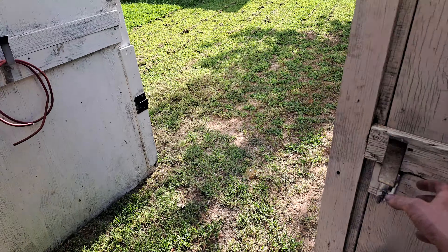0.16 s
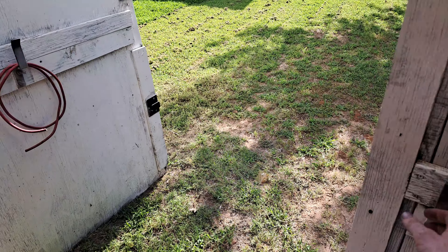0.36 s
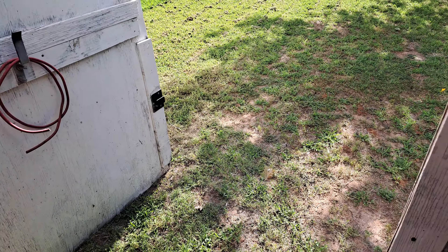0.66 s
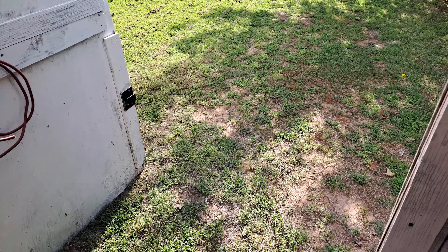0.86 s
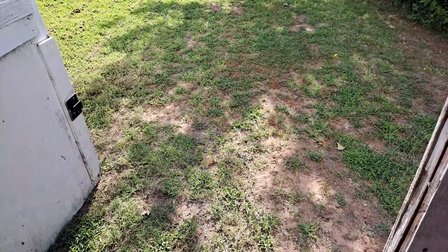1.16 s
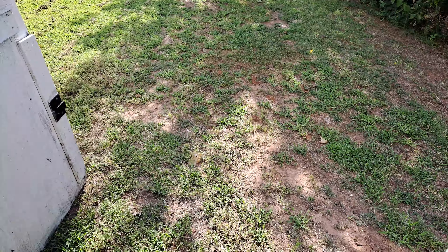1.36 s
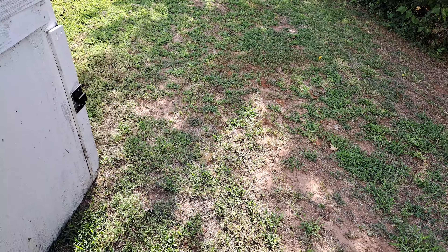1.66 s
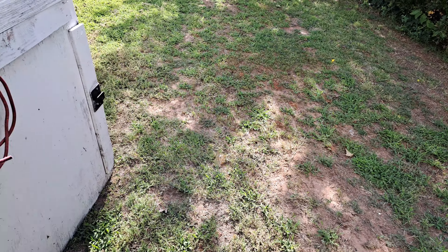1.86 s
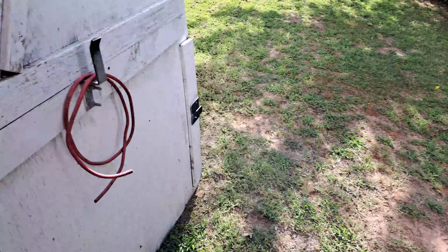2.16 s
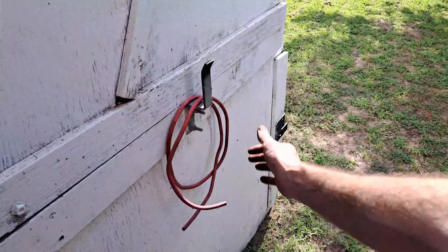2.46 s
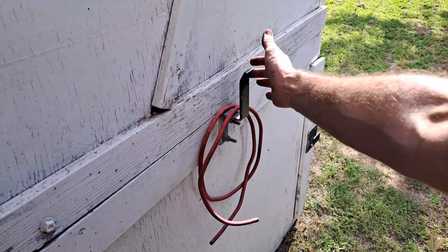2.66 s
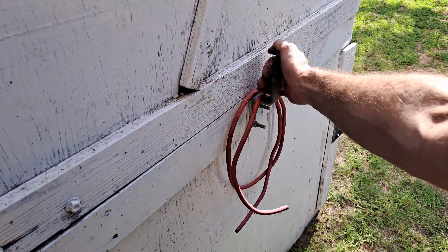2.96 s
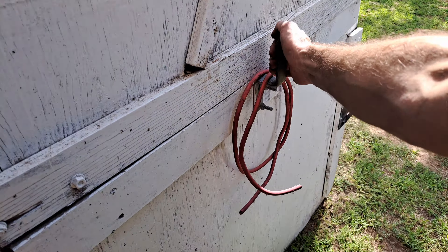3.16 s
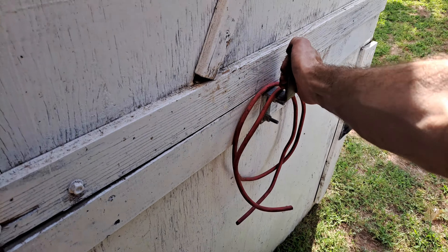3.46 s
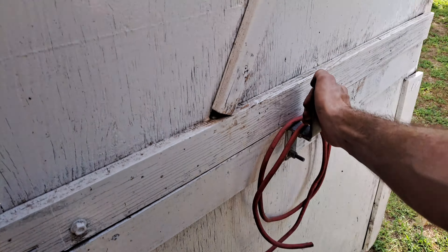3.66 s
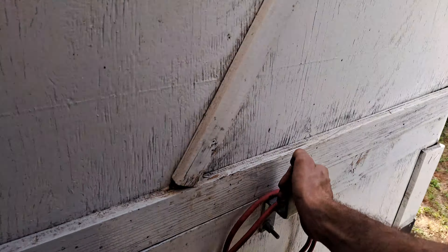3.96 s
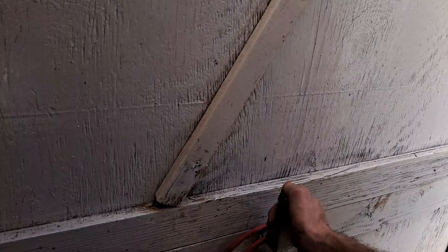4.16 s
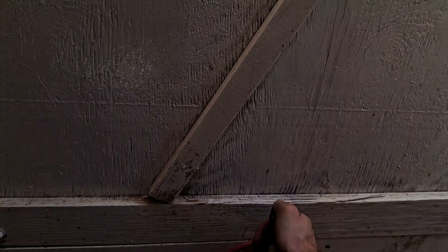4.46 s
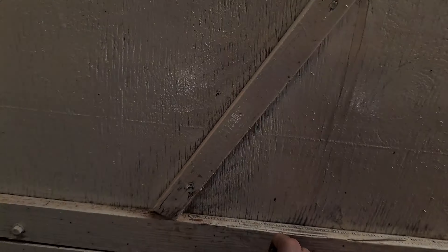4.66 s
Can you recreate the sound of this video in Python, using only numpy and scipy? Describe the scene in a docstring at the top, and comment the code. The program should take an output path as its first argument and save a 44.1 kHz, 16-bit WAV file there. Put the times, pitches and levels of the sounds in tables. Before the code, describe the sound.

Close up in a small shed, two plank doors are shut in turn. The first swishes through dry grass and hits its stop with a loud wooden bang and a quick metal rattle. A quieter moment leaves a low outdoor rumble and a faraway machine. Then the second door is grabbed and dragged, crackling and scraping in bursts, its boards shaking, until a low shudder and several knocks bring it home.

```python
"""Shutting two shed doors

Two plank doors are swung shut from inside. The first brushes over the grass, bangs against its stop
and shakes its iron latch; the second is grabbed by a hook, drags over the ground, shudders and knocks
home. Impacts excite the damped modes of wood and iron; stick-slip friction rasps and shakes the boards.
Outside are a far machine's drone and two faint whistles; the small shed reverberates briefly."""
import sys
import numpy as np
from scipy import signal
from scipy.fft import rfft, irfft, next_fast_len
from scipy.io import wavfile

SR = 44100
rng = np.random.default_rng(int(sys.argv[2]) if len(sys.argv) > 2 else 0)


def master_out(mix):
    """Clip the mix to full scale and print it as 16-bit PCM to the path in sys.argv[1]."""
    frames = np.transpose(np.atleast_2d(mix))
    ceiling = np.clip(frames, -1, 1)
    pcm = np.round(ceiling * 32767).astype(np.int16)
    wavfile.write(sys.argv[1], SR, pcm)


N = 211676
T = np.arange(N) / SR
RING_T = T[:SR * 3 // 4]  # time axis of one free decay [s]


def undb(db):
    """Amplitude ratio of a level in decibels."""
    return 10 ** (np.asarray(db) / 20)


def filtered(x, response):
    """Linear filtering: the spectrum is multiplied by a frequency response."""
    size = next_fast_len(x.shape[-1] + 4096)
    hz = np.maximum(np.fft.rfftfreq(size, 1 / SR), 1)
    return irfft(rfft(x, size) * response(hz), size)[..., :x.shape[-1]]


def colour(x, points):
    """Spectral shaping through (frequency [Hz], gain [dB]) points."""
    hz, db = np.transpose(points)
    return filtered(x, lambda f: undb(np.interp(np.log(f), np.log(hz), db)))


def resonate(x, peaks):
    """Forced response of resonances given as (frequency [Hz], bandwidth [Hz], gain [dB])."""
    return filtered(x, lambda f: 1 + sum(undb(db) / (1 + 2j * (f - hz) / bw) for hz, bw, db in peaks))


def unit(x, band):
    """Normalisation: the mean of the channels gets rms 1 within a frequency band."""
    return x / np.std(filtered(x.mean(0), lambda f: (f > band[0]) & (f < band[1])))


def waver(per_s):
    """Random modulation with a standard deviation near 1."""
    knots = rng.standard_normal(1024)
    return 1.345 * np.interp(T * per_s, np.arange(len(knots)), knots)


def noise(size):
    """Diffuse-field noise: coherent between the ears in the bass, nearly incoherent in the treble."""
    mid, side = rng.standard_normal((2, size))
    side = filtered(side, lambda f: np.minimum(0.072 + 1.32 * f / (f + 650) * f / (f + 150), 1))
    return np.array([mid + side, mid - side])


def grains(per_s, spread_db, decay_s):
    """Shot noise: tiny bursts of very uneven size at random instants."""
    clicks = (rng.random(N) < per_s / SR) * undb(spread_db * np.minimum(rng.exponential(size=N), 4))
    power = signal.lfilter([1], [1, -np.exp(-1 / (decay_s * SR))], clicks ** 2)
    return noise(N) * np.sqrt(power)


def strokes(rows, column, power=1, roundness=1.29):
    """Envelope of movements whose energies add; roundness 1 gives pointed peaks, 2 round ones."""
    drop_db = 9.5 * power  # over one rise or fall time
    energy = 0
    for row in rows:
        peak_s, rise_s, fall_s = row[:3]
        away = np.maximum((peak_s - T) / rise_s, (T - peak_s) / fall_s)
        energy = energy + undb(row[column] - drop_db * away ** roundness) ** 2
    return np.sqrt(energy)


def fade(t60):
    """Exponential damping by 60 dB in t60 seconds."""
    return np.exp(-np.log(1000) * RING_T / t60)


def burst(t60):
    """Damped noise, the response of modes too dense to tell apart."""
    return noise(len(RING_T)) * fade(t60)


def crack(t60):
    """Contact transient: an impulse and brief noise, the same at both ears."""
    transient = rng.standard_normal(len(RING_T)) * fade(t60)
    transient[0] = 9
    return transient


def ring(modes, t60_scale, phase_spread, detune):
    """Modal superposition: damped sines, slightly detuned at each blow, with a phase for each ear."""
    out = 0
    for k, (hz, db, t60) in enumerate(modes):
        phase = phase_spread * hz / (hz + 700) * rng.standard_normal((2, 1))
        pitch = hz * (1 + detune * rng.standard_normal())
        amplitude = (-1) ** (k // 2) * undb(db) * fade(t60 * t60_scale)
        out = out + amplitude * np.sin(2 * np.pi * pitch * RING_T + phase)
    return out


def contact(x, db, hz, octaves):
    """Band-limited excitation, octaves to either side of hz; db sets the rms of the first 20 ms."""
    edges = np.clip(hz * 2. ** np.array([-octaves, octaves]), 20, .47 * SR)
    x = signal.sosfilt(signal.butter(2, edges, "band", fs=SR, output="sos"), x)
    return x * undb(db) / np.sqrt(np.mean(x[:, :SR // 50] ** 2))


def add(out, s, x, lag_ms=0):
    """Superposition at time s; an interaural lag at the left ear places the sound to the right."""
    for channel, start in enumerate([s + lag_ms / 1000, s]):
        i = int(start * SR)
        part = x[channel, :max(N - i, 0)]
        out[channel, i:i + len(part)] += part


# outdoor rumble: (frequency [Hz], gain [dB])
RUMBLE_SPECTRUM = [(20, -47), (40, -3), (60, 5.5), (90, -1.5), (150, -2), (300, -4), (420, -7),
                   (800, -11.5), (1500, -23), (3000, -29), (6000, -32.5), (16000, -46)]
# partials of the far machine: (frequency [Hz], level [dB])
DRONE_PARTIALS = [(54.5, -48.5), (123.8, -52), (205, -90), (296, -55), (334, -53)]
def yard():
    """A continuous rumble spectrum under a far machine's line spectrum, wavering in pitch and level."""
    rumble = unit(colour(noise(N), RUMBLE_SPECTRUM), band=(100, 1000)) * undb(-45.5 + waver(6.77))
    drone = 0
    for hz, db in DRONE_PARTIALS:
        amplitude = undb(db + 2.2 * waver(4.98))
        drone = drone + amplitude * np.sin(2 * np.pi * np.cumsum(hz + 1.985 * waver(14)) / SR)
    return rumble + drone


# brushed grass: (frequency [Hz], gain [dB])
GRASS_SPECTRUM = [(300, 15), (900, 6), (2000, 3.5), (3700, 7), (6300, 6.5), (8000, 7), (9800, 1.5),
                  (12600, 8.5), (14200, 4), (16000, 1)]
def grass():
    """Countless blades flicking past a door's edge merge into shot noise; a few tick brightly."""
    swish = colour(grains(per_s=3300, spread_db=2.5, decay_s=0.004), GRASS_SPECTRUM)
    ticks = colour(grains(per_s=50, spread_db=3, decay_s=0.0005), GRASS_SPECTRUM)
    ticks = np.diff(ticks, prepend=0)  # tilts toward the treble
    return unit(swish, band=(8500, 15500)) * undb(4.5) + unit(ticks, band=(8500, 15500)) * undb(-4.5)


# door swings through the grass, the last as the hook is gripped: (peak time [s], rise [s], fall [s], relative
# grass level [dB], relative sheen level [dB])
DOOR_SWINGS = [(.07, 0.12, 0.071, -45.5, -58), (.32, 0.63, 0.36, -52, -47), (.63, 0.23, 0.17, -59.5, -59),
               (1.0, 0.073, 0.16, -48, -46.5), (1.17, 0.13, 0.16, -47.5, -46), (1.46, 0.2, 0.19, -49, -61),
               (2.23, 0.21, 0.52, -59.5, -72), (2.55, 0.034, 0.065, -59, -68),
               (3.29, 0.13, 0.1, -47.5, -52)]
# sheen of dry blades: (frequency [Hz], gain [dB])
SHEEN_SPECTRUM = [(8000, -24), (11000, -3), (12600, 2), (16000, -4)]
def swinging():
    """A door's speed modulates the amplitude of the grass noise; dry blades add a high sheen."""
    swish = grass() * strokes(DOOR_SWINGS, column=3)
    sheen = colour(grains(per_s=1700, spread_db=5, decay_s=0.001), SHEEN_SPECTRUM)
    return swish + unit(sheen, band=(8500, 15500)) * strokes(DOOR_SWINGS, column=4) * undb(1)


# stems and splinters breaking: (time [s], level [dB], centre frequency [Hz])
STEM_SNAPS = [(0.083, -34, 4800), (0.326, -39, 10100), (.483, -32.5, 12600), (.64, -39.5, 12100),
              (1.43, -45, 5170), (2.685, -51.5, 8740), (3.043, -50.5, 7450), (3.106, -46, 3940),
              (3.127, -41.5, 3360), (3.282, -26.5, 5700), (3.347, -36.5, 9000), (3.441, -42.5, 4500)]
def snaps():
    """Brittle fracture: each dry stem or splinter gives one click."""
    out = np.zeros((2, N))
    for s, db, hz in STEM_SNAPS:
        add(out, s, contact(burst(t60=0.04), db, hz, octaves=0.57))
    return out


# modes of a plank door: (frequency [Hz], relative level [dB], decay time T60 [s])
PLANK_MODES = [(133.6, 0, .75), (230.5, 6.5, .36), (277.3, -1, .38), (330.3, -11, .8), (403.5, -8, .35),
               (449.4, -4.5, .35), (492.8, 1, .2), (536, 6, .2), (562, 7, .17), (675, 4, .11),
               (778, 1, .15), (805, 3, .16), (861, 1, .14), (903, 2, .15), (980, -5, .2), (1028, 1, .15),
               (1095, -4, .22), (1330, -7, .15)]
# blows: (time [s], level [dB], centre frequency [Hz], half-width [octaves], decay time factor [1])
PLANK_BLOWS = [(.684, -34.5, 383, 0.29, 1.3), (0.744, -38.5, 1570, 0.64, 1.54),
               (.972, -35, 1220, 1.46, 0.48), (.998, -42, 2860, 0.27, 2.1), (1.235, -38, 350, 1.6, 1.1),
               (1.4704, -20.5, 265, 0.54, 0.47), (1.4772, -13.5, 670, 0.83, 0.65),
               (1.485, -27, 585, 0.5, 1.6), (1.503, -24, 800, 0.77, 1.75), (1.53, -25.5, 345, 0.51, 0.79),
               (2.477, -37.5, 228, 1.5, 0.65), (3.136, -31.5, 780, 0.24, 0.44),
               (3.284, -34, 570, 0.57, 1.4), (3.347, -31.5, 2180, 0.71, 0.29),
               (3.869, -35, 300, 0.87, 0.44), (3.97, -32, 484, 0.34, .2), (4.288, -29.5, 1580, 1.57, 1.03),
               (4.565, -27, 378.7, 0.18, 0.24), (4.676, -36, 1780, 1.1, 1.3),
               (4.729, -32, 2240, 0.88, 0.24), (4.762, -26, 2220, 1.3, 0.18),
               (4.793, -26.5, 1260, 2.3, 0.38)]
def knocks():
    """Impact excites the plank modes, with a crack, splintery treble and a blur of loose boards."""
    out = np.zeros((2, N))
    soft_wood = signal.butter(3, [200, 1250], "band", fs=SR, output="sos")
    for s, db, hz, octaves, t60_scale in PLANK_BLOWS:
        blur = signal.sosfilt(soft_wood, noise(len(RING_T))) * undb(17) * fade(0.19 * t60_scale)
        splinters = undb(16.5) * burst(0.23 * t60_scale)
        modes = ring(PLANK_MODES, t60_scale, phase_spread=0.84, detune=0.004)
        blow = modes + undb(19) * crack(t60=0.026) + splinters + blur
        lag_ms = 0.35 if s < 3 else 0.078  # first door to the right, second door ahead
        add(out, s, contact(blow, db, hz, octaves), lag_ms)
    return out


def chatter(pitch, width_hz):
    """Rough stick-slip tone: narrow-band noise centred on a path of (time [s], frequency [Hz])."""
    phase = 2 * np.pi * np.cumsum(np.interp(T, *np.transpose(pitch))) / SR
    roughness = filtered(noise(N), lambda f: 1 / (1 + (2 * f / width_hz) ** 2))
    return roughness * np.sin(phase + rng.uniform(-1, 1, (2, 1)))


# jolts that shake the boards: (frequency [Hz], gain [dB])
JOLT_SPECTRUM = [(50, -26), (110, -0.5), (170, 5), (240, -1.5), (430, 5.5), (650, -11), (1000, -18),
                 (2500, -24)]
def boards(movements, column):
    """Forced vibration: friction jolts the plank modes, nearly in proportion to the effort."""
    jolts = colour(grains(per_s=320, spread_db=5.5, decay_s=0.0048), JOLT_SPECTRUM)
    shaking = resonate(jolts, [(hz, 16, db) for hz, db, _ in PLANK_MODES])
    return unit(shaking, band=(140, 700)) * strokes(movements, column, power=0.94) * undb(-2.5)


# shoves: (peak time [s], rise [s], fall [s], relative levels of rasp [dB], grass [dB], boards [dB])
DOOR_SHOVES = [(1.015, 0.044, 0.11, -47, -60, -48), (1.215, 0.084, 0.059, -43.5, -50, -48),
               (3.565, 0.08, 0.075, -30, -39, -39), (3.66, 0.065, 0.078, -26.5, -37.5, -34),
               (3.96, 0.12, 0.1, -37, -48, -42), (4.13, 0.14, 0.099, -29, -39.5, -36.5),
               (4.42, 0.13, 0.11, -34.5, -41.5, -52), (4.575, 0.086, 0.082, -27, -34.5, -34.5),
               (4.8, 0.076, 0.047, -36, -42, -34)]
# friction on the ground: (frequency [Hz], gain [dB])
RASP_SPECTRUM = [(300, -4.5), (700, 3.5), (1100, -7), (2300, -1), (3400, 1), (4400, 4.5), (6000, -1.5),
                 (8000, -8), (11000, -31)]
# resonances of the edge board: (frequency [Hz], bandwidth [Hz], gain [dB])
EDGE_RESONANCES = [(1338, 50, 3), (1490, 50, 3), (1780, 30, 7), (2358, 36, 7), (2518, 50, 4), (3127, 40, 3),
                   (3290, 130, 4), (4150, 250, -2)]
# chatter pitch, following the edge's point of contact: (time [s], frequency [Hz])
EDGE_PITCH = [(3.55, 3500), (3.66, 3206), (3.74, 2460), (3.95, 2730), (4.03, 3000), (4.12, 4410),
              (4.2, 4200), (4.3, 2501), (4.6, 2598)]
def dragging():
    """Stick-slip friction on the ground drives the edge board as a door is shoved through the grass."""
    catches = undb(0.43 * waver(per_s=92))  # the level jumps as the edge catches and slips
    crackle = colour(grains(per_s=750, spread_db=3.2, decay_s=0.0007), RASP_SPECTRUM)
    rasp = unit(resonate(crackle, EDGE_RESONANCES), band=(1500, 5000))
    tone = unit(chatter(EDGE_PITCH, width_hz=650), band=(1500, 5000))
    drag = strokes(DOOR_SHOVES, column=3, roundness=1.8)  # holds, then stops short as the edge lifts
    edge = (rasp + undb(-4) * tone) * catches * drag * undb(-3.5)
    return edge + grass() * strokes(DOOR_SHOVES, column=4) + boards(DOOR_SHOVES, column=5)


# modes of the latch: (frequency [Hz], relative level [dB], decay time T60 [s])
IRON_MODES = [(1744, -1, .28), (2304, -4, .3), (2606, -7, .28), (3140, -1, .15), (3440, 0, .29),
              (3650, -4, .28), (3970, -1, .28), (4619, -1, .24), (4727, -5, .26), (6355, 7, .19),
              (6740, -2, .2), (7935, -3, .2), (9168, -5, .16), (10460, 2, .19)]
# latch striking its keeper: (time [s], level [dB], centre frequency [Hz], click level [dB])
LATCH_STRIKES = [(1.4781, -21, 5200, -33), (1.526, -18, 3930, -43), (1.5549, -25, 2940, -40),
                 (1.561, -27, 3200, -44), (1.5676, -30, 3340, -36), (1.606, -35, 2137, -51),
                 (1.634, -41, 3950, -45.5), (1.808, -65, 5000, -53)]
def latch():
    """Repeated impacts of iron on iron click and excite the latch's inharmonic modes."""
    out = np.zeros((2, N))
    for s, db, hz, click_db in LATCH_STRIKES:
        blur = undb(13) * burst(t60=0.15)
        modes = ring(IRON_MODES, t60_scale=1, phase_spread=1.8, detune=0.001)
        clack = contact(modes + undb(27) * crack(t60=0.024) + blur, db, hz, octaves=0.96)
        click = contact(burst(t60=0.021), click_db, hz=10500, octaves=0.79)
        add(out, s, clack + click, lag_ms=0.858)
    return out


# whole door flexing: (time [s], level [dB], frequency [Hz], swell [s], decay time T60 [s])
DOOR_FLEXES = [(1.535, -27, 54.7, 0.0086, 0.25), (3.137, -30.5, 57.5, 0.0076, 0.12),
               (3.27, -44, 36, 0.03, .25), (4.526, -21, 57.36, 0.053, 0.34)]
def shudder():
    """A door vibrates in its lowest bending modes when stopped, tugged or jammed against the ground."""
    out = np.zeros((2, N))
    for s, db, hz, swell_s, t60 in DOOR_FLEXES:
        push = np.minimum(RING_T / swell_s, 1)
        release = np.exp(-np.log(1000) * np.maximum(RING_T - swell_s, 0) / t60)
        flex = undb(db) * push * release * np.sin(2 * np.pi * hz * RING_T)
        add(out, s, np.tile(flex, (2, 1)))
    return out


# faint whistles outside: (time [s], duration [s], frequency [Hz], level [dB])
WHISTLES = [(2.09, .22, 2440, -63), (2.755, .07, 8050, -60)]
def whistles():
    """Thin pure tones waver by random amplitude and frequency modulation."""
    out = 0
    for s, length_s, hz, db in WHISTLES:
        swell = np.sqrt(np.maximum(1 - (2 * (T - s) / length_s - 1) ** 2, 0))
        amplitude = undb(db + 2 * waver(74)) * swell
        out = out + amplitude * np.sin(2 * np.pi * np.cumsum(hz + 35 * waver(150)) / SR)
    return out


# hand movements: (peak time [s], rise [s], fall [s], relative levels of rub [dB], boards [dB])
HAND_MOVES = [(2.495, 0.033, 0.069, -51.5, -43.5), (2.85, 0.13, 0.64, -66.5, -48.5),
              (3.2, 0.089, .07, -43.5, -37.5), (3.29, 0.065, 0.054, -32.5, -31)]
# friction under the hand: (frequency [Hz], gain [dB])
RUB_SPECTRUM = [(400, -5), (1200, -3), (1800, -3.5), (3500, 0.5), (6200, 1.5), (7500, -4), (9000, -17),
                (14000, -25)]
# rasp pitch, rising as the grip tightens: (time [s], frequency [Hz])
HOOK_PITCH = [(3.19, 4000), (3.23, 6100), (3.3, 6700)]
def gripping():
    """Sliding friction: a hand brushes the door, slips round the hook and tugs, shaking the boards."""
    rub = colour(grains(per_s=500, spread_db=4, decay_s=0.0058), RUB_SPECTRUM)
    rasp = chatter(HOOK_PITCH, width_hz=1500)
    hand = unit(rub, band=(1500, 7000)) + undb(-9) * unit(rasp, band=(1500, 9000))
    return hand * strokes(HAND_MOVES, column=3) * undb(1.6) + boards(HAND_MOVES, column=4)


# the dragging edge jumping free: (time [s], level [dB], centre frequency [Hz])
EDGE_SNAGS = [(3.519, -41, 2830), (3.5457, -36, 2800), (3.577, -30.5, 3430), (3.628, -26, 3030),
              (3.6524, -25, 2710), (3.657, -24.5, 2380), (3.698, -42, 2400), (3.742, -38.5, 2470),
              (3.9393, -38, 2300), (4.065, -31, 1695), (4.357, -43, 3000)]
def snags():
    """Sudden release of the snagged edge excites the edge board's resonances with a sharp crack."""
    out = np.zeros((2, N))
    for s, db, hz in EDGE_SNAGS:
        jump = resonate(burst(t60=0.017), EDGE_RESONANCES)
        add(out, s, contact(jump, db, hz, octaves=0.69))
    return out


def shed(x, wet_db, t60, cutoff_hz):
    """Reverberation of a small wooden room: convolution with a diffuse tail that builds and decays."""
    tail = burst(t60) * (1 - np.exp(-RING_T / 0.035))
    tail = tail / np.sqrt(np.sum(tail[0] ** 2))
    tail = filtered(tail, lambda f: 1 / (1 + 1j * f / cutoff_hz))
    return x + undb(wet_db) * signal.fftconvolve(x, tail, axes=1)[:, :N]


def scene():
    """Superposition of all sources; only the sharp transients reverberate."""
    transients = shed(snaps() + knocks() + latch() + snags(), wet_db=-11.5, t60=0.36, cutoff_hz=4930)
    return transients + yard() + swinging() + dragging() + shudder() + whistles() + gripping()


def record(dry):
    """Frequency response of two microphones, the right one brighter, then clipping and a low-pass."""
    left = colour(dry[0], [(100, 5.5), (500, -2.5), (2000, -1), (7000, -11), (12500, -15.5)])
    right = colour(dry[1], [(100, 5.5), (500, 0.38), (2000, 0), (7000, -10.5), (12500, -10.5)])
    low_pass = signal.ellip(10, .2, 80, 15900, fs=SR, output="sos")
    return signal.sosfilt(low_pass, np.clip([left, right], -1, 1))


dry = scene()
out = record(dry)
master_out(out)
```